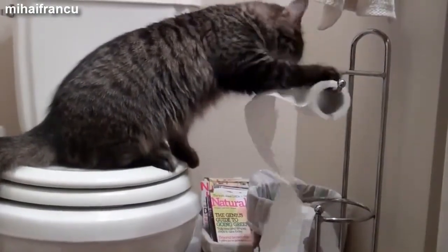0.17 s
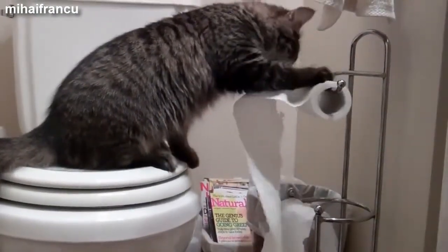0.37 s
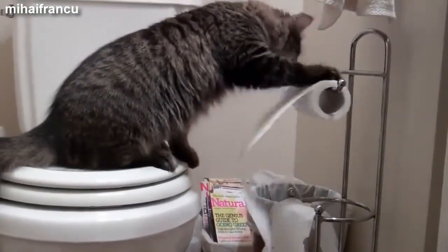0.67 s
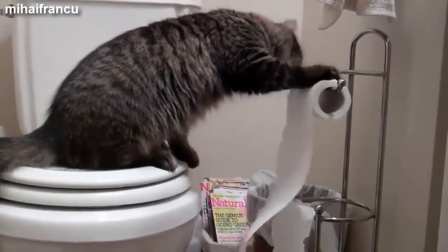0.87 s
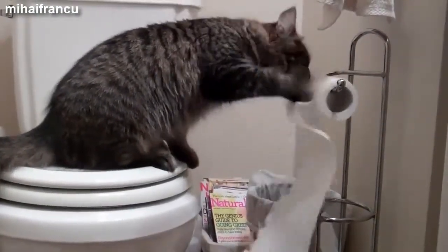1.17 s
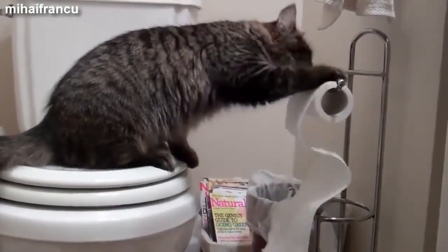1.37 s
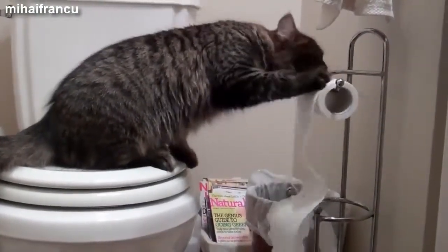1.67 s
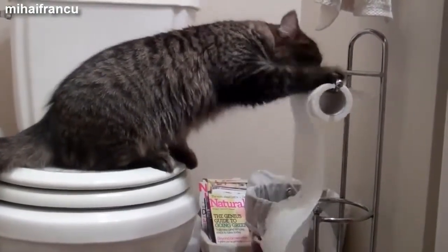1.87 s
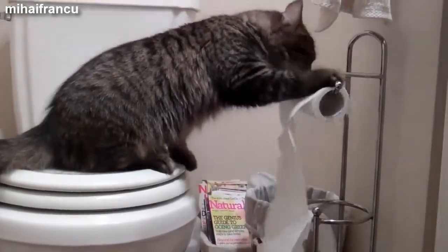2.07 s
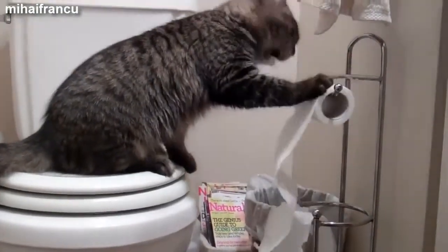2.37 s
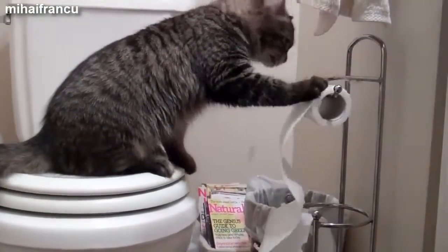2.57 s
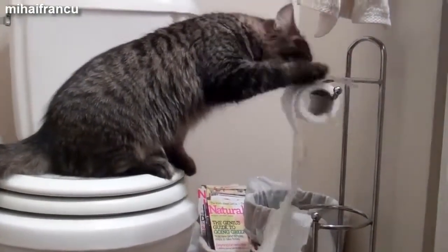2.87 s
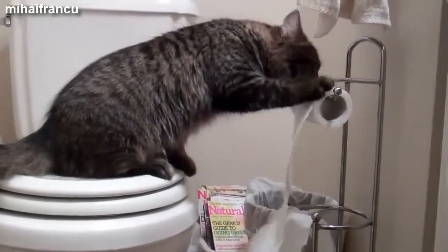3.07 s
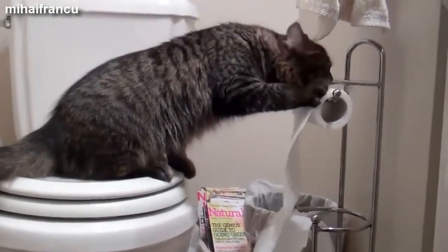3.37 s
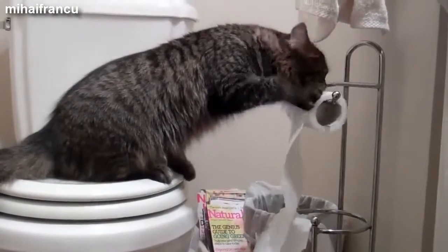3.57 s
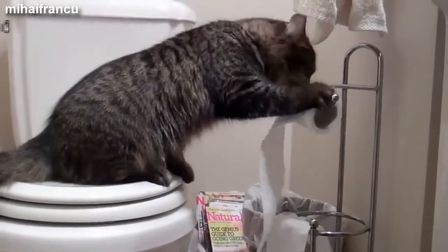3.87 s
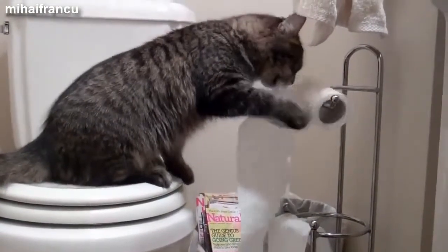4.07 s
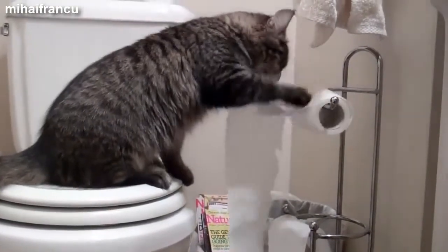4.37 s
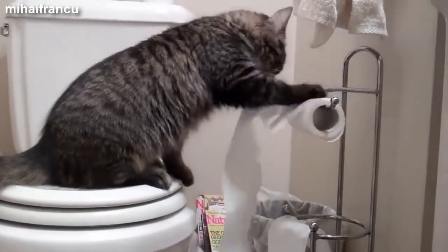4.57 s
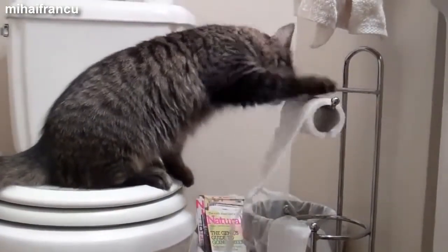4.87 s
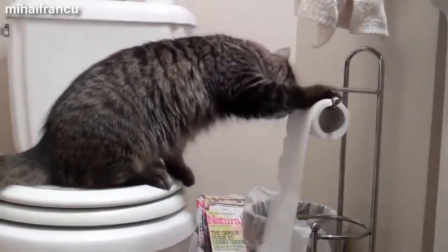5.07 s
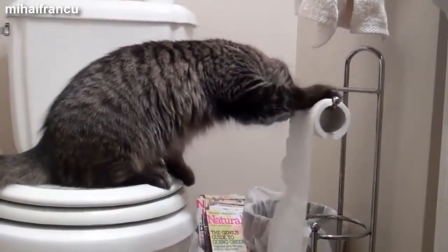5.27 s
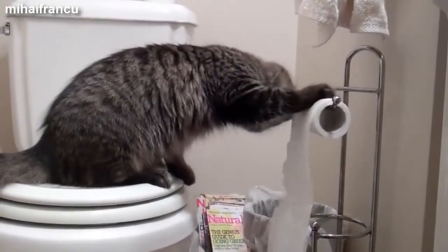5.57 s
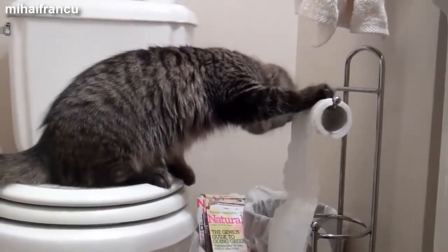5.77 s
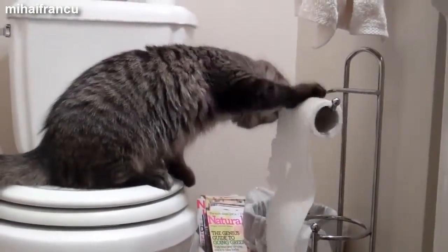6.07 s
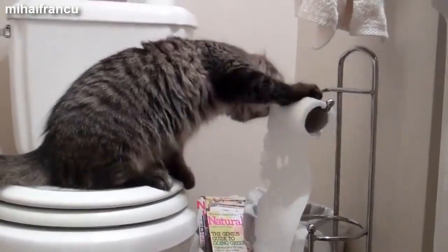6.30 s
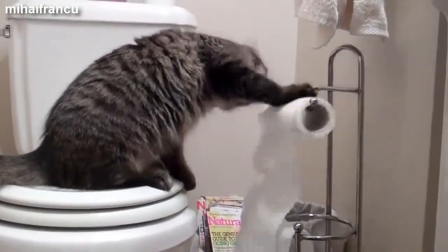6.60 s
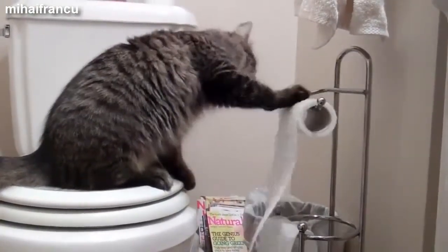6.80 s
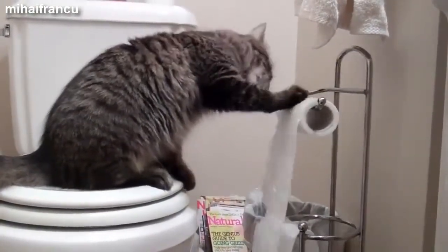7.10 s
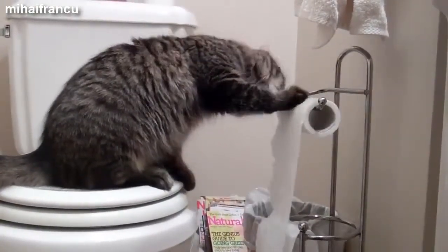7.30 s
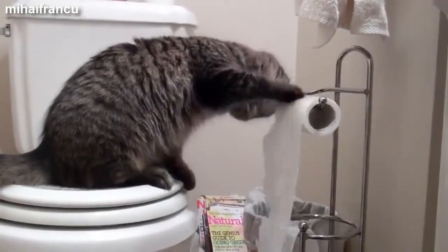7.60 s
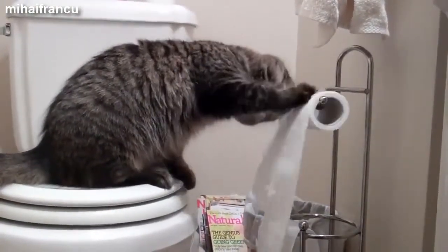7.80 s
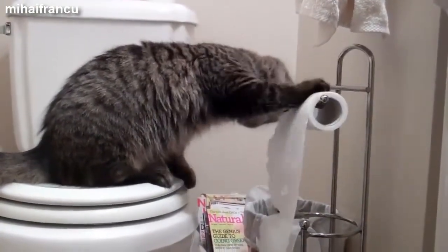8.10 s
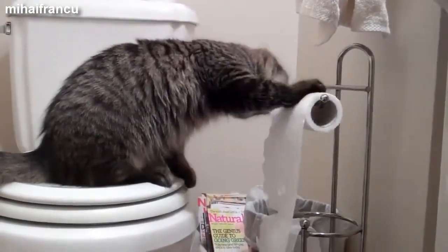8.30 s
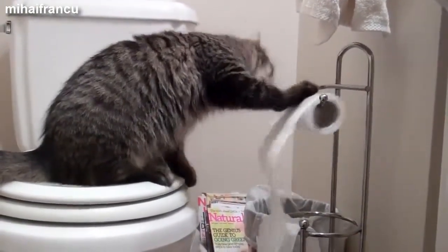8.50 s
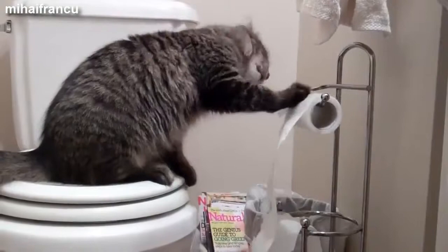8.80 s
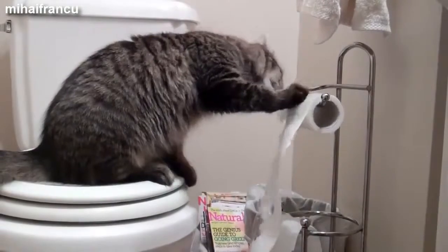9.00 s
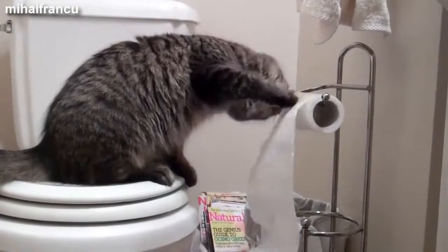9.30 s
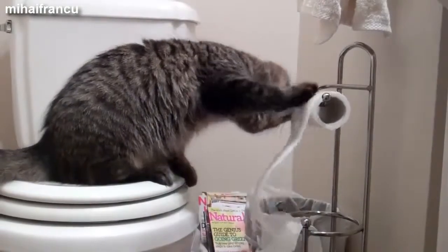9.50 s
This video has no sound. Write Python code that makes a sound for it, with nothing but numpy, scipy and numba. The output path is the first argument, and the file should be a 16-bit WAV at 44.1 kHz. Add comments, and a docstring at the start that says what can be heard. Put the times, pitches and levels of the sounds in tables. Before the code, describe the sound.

Close stereo pickup of cardboard tumbling on a steel spindle, with claw ticks and dry paper rustle over quiet room hiss. An early cluster of dull knocks gives way to sparse scratching strokes, then a brief bright clink. After a quieter stretch comes a short squeaky groan and a very sharp smack, followed by loose rattling that thins out, a softer second burst of knocks, and a quiet end. Short tiled-room echo.

```python
"""The cardboard core of a toilet roll tumbles and knocks on its steel spindle as a cat paws the roll. Each
knock is a filtered burst of push, chatter and rebounds; random grains make the rasp and rustle. Claws tick and
hard hits crackle in noise bursts, the rim cracks, the steel arm clinks, the core groans, feet thump. A small
hard-walled bathroom rings in decaying noise; two microphones with automatic gain listen."""
import sys
import numpy as np
from scipy import signal
from scipy.fft import rfft, irfft
from scipy.io import wavfile
from scipy.ndimage import uniform_filter1d
from numba import njit

SR = 44100
rng = np.random.default_rng(int(sys.argv[2]) if len(sys.argv) > 2 else 0)


def transcribe(signal):
    """Save signal, clipped to [-1, 1], as a 16-bit WAV file at the path in sys.argv[1]."""
    frames = np.atleast_2d(signal).T
    limited = np.clip(frames, -1, 1)
    pcm = np.round(limited * 32767).astype(np.int16)
    wavfile.write(sys.argv[1], SR, pcm)


N = 425565
TIME = np.arange(N) / SR
RING = TIME[:SR]  # one second

# relative spectrum of the cardboard core: (frequency [Hz], density [dB/Hz])
CORE_SPECTRUM = [(30, -8.5), (52, -12.5), (90, -7.5), (150, -5.5), (260, 3.5), (420, -3.5), (750, -2),
                 (1400, -1.5), (2300, -5), (4200, -6), (5500, -8), (11000, -6)]


def amp(db):
    """Decibels to gain."""
    return 10 ** (np.asarray(db) / 20)


def unit(x):
    """Scale to an energy of one."""
    return x / np.sqrt(np.sum(x ** 2))


def lookup(points, size=N):
    """Read a (frequency [Hz], value) table at every transform bin, on a log-frequency axis."""
    hz, value = np.transpose(points)
    bins_hz = np.fft.rfftfreq(size, 1 / SR) + 1
    return np.interp(np.log(bins_hz), np.log(hz), value)


def ring(x, response):
    """Pass a sound through an impulse response."""
    return signal.fftconvolve(np.atleast_2d(x), np.atleast_2d(response), axes=-1)[:, :N]


def colour(points, size=2048):
    """Minimum-phase impulse response of a dB spectrum, by folding its cepstrum; energy one."""
    cepstrum = irfft(lookup(points, size) * np.log(10) / 20)
    cepstrum[1:size // 2] *= 2
    cepstrum[size // 2 + 1:] = 0
    return unit(irfft(np.exp(rfft(cepstrum))))


def even(x, size=16, count=4096):
    """Level the broad humps and hollows in the spectrum of a short burst."""
    power = uniform_filter1d(abs(rfft(x, count)) ** 2, size=size)
    bins_hz = np.fft.rfftfreq(count, 1 / SR) + 1
    inverse = np.transpose([bins_hz, -10 * np.log10(power + 1e-12)])
    return signal.fftconvolve(x, colour(inverse, size=count))[:len(x)]


def butter(x, order, hz, kind="low"):
    """Butterworth filter."""
    return signal.sosfilt(signal.butter(order, hz, kind, fs=SR, output="sos"), x)


def add(track, s, sound):
    """Mix a sound in at a time in seconds."""
    start = max(int(s * SR), 0)
    track[start:start + len(sound)] += sound[:N - start]


def walk(rate_hz):
    """Random wander: straight lines between normal draws."""
    knots_s = np.arange(0, N / SR + 1, 1 / rate_hz)
    return np.interp(TIME, knots_s, rng.standard_normal(len(knots_s)))


def swell(length_s):
    """Envelope that rises to one at half its length, then dies away."""
    return 2 * RING / length_s * np.exp(1 - 2 * RING / length_s)


def grains(rate_hz, spread_db):
    """Random impulses of uneven size and either sign, rms one."""
    chance, size, sign = rng.random(N), rng.standard_normal(N), rng.standard_normal(N)
    hits = chance < rate_hz / SR
    return np.sqrt(N) * unit(hits * amp(spread_db * np.clip(size, -2, 2)) * np.sign(sign))


def modes(table):
    """Impulse response of decaying resonances with alternating polarity, energy one."""
    total = 0
    for k, (hz, db, t60_s) in enumerate(table):
        mode = np.sin(2 * np.pi * hz * RING) * np.exp(-np.log(1000) * RING / t60_s)
        total = total + (-1) ** k * amp(db) * unit(mode)
    return unit(total)


@njit
def bandpass(x, hz, damping):
    """State-variable band-pass whose centre may move every sample."""
    y, band, low = np.empty(len(x)), 0., 0.
    for i in range(len(x)):
        g = np.tan(np.pi * hz[i] / SR)
        v = (band + g * (x[i] - low)) / (1 + g * (g + damping))
        band, low, y[i] = 2 * v - band, low + 2 * g * v, damping * v
    return y


def diffuse(size):
    """Noise arriving from all sides; how alike the two microphones are depends on frequency."""
    # microphone likeness: (frequency [Hz], correlation [-1 to 1])
    likeness = [(60, 0.48), (300, 0.66), (700, 0.52), (1200, 0.59), (2200, 0.31), (4000, 0.14),
                (6500, -0.28), (11000, -0.23)]
    mid, side = rfft(rng.standard_normal((2, size)))
    alike = np.clip(lookup(likeness, size), -1, 1)
    left_right = np.array([[1], [-1]])
    pair = mid * np.sqrt(1 + alike) + left_right * side * np.sqrt(1 - alike)
    return irfft(pair / np.sqrt(2), size)


def air(level_db=-62, wander_db=-0.5):
    """Hiss and faint rumble of the quiet room: coloured diffuse noise, almost steady."""
    # relative spectrum of the quiet room: (frequency [Hz], density [dB/Hz])
    air_spectrum = [(20, -2), (35, 0), (55, -6), (108, -1.5), (155, -8), (320, -7), (450, -8), (650, -7.5),
                    (1020, -10.5), (1400, -10.5), (2400, -14.5), (5300, -16), (8900, -23.5), (11900, -35.5)]
    return ring(diffuse(N), colour(air_spectrum)) * amp(level_db + wander_db * walk(6.1))


def bathroom(onset_s=0.00029):
    """Dense echoes from close walls: diffuse noise with a decay time for each band."""
    # ring of the tiled room: (frequency [Hz], t60 [s])
    room_t60 = [(100, 0.64), (260, 0.26), (700, 0.29), (1840, 0.24), (4850, 0.18), (11000, 0.17)]
    # relative wall scattering: (frequency [Hz], level [dB])
    scatter = [(60, 3.5), (200, -0.5), (400, 1), (800, -0.5), (11000, -1)]
    noise, tail = rfft(diffuse(SR)) * amp(lookup(scatter, SR)), 0
    for k, (_, t60_s) in enumerate(room_t60):
        # overlapping bands whose shares sum to one
        share = lookup([(hz, j == k) for j, (hz, _) in enumerate(room_t60)], SR)
        tail = tail + irfft(noise * share, SR) * np.exp(-np.log(1000) * RING / t60_s)
    return np.sqrt(2) * unit(tail * (1 - np.exp(-RING / onset_s)))


def shifting(x, rooms, rate_hz=4):
    """The roll shifts on its spindle, so its sound wanders between sets of wall echoes."""
    shares = np.array([walk(rate_hz) for _ in rooms])
    shares = shares / np.sqrt(np.sum(shares ** 2, axis=0))
    return sum(ring(x * share, room) for share, room in zip(shares, rooms))


def stand_boom(core):
    """The core shakes the stand and the room around it, exciting their resonances."""
    # stand and room resonances: (frequency [Hz], relative level [dB], t60 [s])
    boom_modes = [(32.2, 4, 1), (77, -4, 0.46), (102.4, 5.5, 0.53), (199.5, 5, 0.34), (219, -2, 0.067),
                  (272.3, 4, 0.37), (316, 3.5, 0.55), (341, -5, 0.18), (414, -26, 0.37), (480.3, 7.5, 0.23),
                  (586.4, 3, 0.4), (622, -2, 0.29), (684, -2.5, 0.43), (747, -5, 0.27), (971, -3, 0.11),
                  (1180, -1.5, 0.14), (1490, -11, 0.2), (1516, -6, 0.15), (2143, -23, 0.3),
                  (3580, 3.5, 0.24)]
    return ring(core, modes(boom_modes))


def thumps(length_s=0.024):
    """The cat's weight shifts against the stand: padded feet give a dull, drawn-out push."""
    # weight shifts: (time [s], relative level [dB])
    thump_hits = [(3.762, -54.5), (4.09, -60), (6.33, -52), (6.808, -32), (7.159, -47), (8.759, -48)]
    # relative spectrum of a padded foot: (frequency [Hz], density [dB/Hz])
    foot_spectrum = [(30, -33), (70, -14), (105, 19), (160, -21), (400, -4.5), (800, -39), (3000, -70)]
    track = np.zeros(N)
    for s, db in thump_hits:
        add(track, s, amp(db) * rng.standard_normal(SR) * swell(length_s))
    return ring(track, colour(foot_spectrum))


def groans(overtone=0.13, waver=0.038, grit=0.38, grit_hz=1300):
    """The core sticks and slips on the spindle: an uneven tone swells and dies, each slip scraping."""
    # stick-slips: (time [s], pitch [Hz], relative level [dB], swell length [s], roughness [0-1])
    slips = [(6.657, 342, -49, 0.025, 0.8), (6.766, 755, -34.5, 0.054, 0.3),
             (7.787, 322, -38.5, 0.022, 0.54), (7.823, 318, -43.5, 0.018, 0.5)]
    track = np.zeros(N)
    for s, hz, db, length_s, rough in slips:
        phase = 2 * np.pi * np.cumsum(hz * (1 + waver * walk(386)[:SR])) / SR
        tone = np.sin(phase) + overtone * np.sin(2 * phase)
        tone = tone * (1 + rough * walk(294)[:SR] / 2)
        scrape = butter(rng.standard_normal(SR), 2, grit_hz)
        scrape = np.sqrt(SR) * unit(scrape * np.maximum(np.sin(phase), 0))
        add(track, s, amp(db) * swell(length_s) * (tone + grit * rough * scrape))
    return track


def clinks():
    """The steel arm, jolted in its frame, rings briefly in its modes."""
    # jolts: (time [s], relative level [dB])
    jolts = [(4.304, -47), (4.343, -30.5)]
    # steel arm modes: (frequency [Hz], relative level [dB], t60 [s])
    steel_modes = [(1080, 1, 0.045), (1130, 1, 0.036), (1210, 4, 0.046), (1300, -1.5, 0.065),
                   (1900, -4, 0.047), (2500, -3, 0.012), (4500, -16, 0.058), (6300, -22, 0.089),
                   (8900, -19, 0.22)]
    track, sound = np.zeros(N), modes(steel_modes)
    for s, db in jolts:
        add(track, s, amp(db) * sound)
    return track


def strokes(shape=0.86, rasp_hz=1900, sag=0.19, paw_rest_db=-79, sheet_rest_db=-75.5):
    """Paw strokes speed up and slow; gives rasp strength, rasp pitch [Hz] and rustle strength."""
    # strokes: (time of peak speed [s], rise [s], fall [s], relative rasp [dB], relative rustle [dB])
    stroke_table = [(.005, 0.099, 0.12, -45.5, -51), (.3, 0.11, 0.056, -55.5, -60.5),
                    (.385, 0.021, 0.043, -57, -60.5), (0.539, 0.052, 0.27, -72, -67.5),
                    (1.048, 0.059, 0.13, -72, -70), (1.28, 0.073, 0.052, -59.5, -61),
                    (1.745, 0.07, 0.089, -64, -65.5), (1.93, 0.04, 0.073, -62, -61.5),
                    (2.03, 0.023, .04, -57.5, -57), (2.085, 0.024, 0.033, -52.5, -53),
                    (2.16, 0.07, 0.19, -56.5, -54.5), (2.288, 0.026, 0.029, -47.5, -50),
                    (2.33, 0.046, 0.024, -45.5, -51), (3.66, 0.28, 0.13, -67.5, -66),
                    (3.745, 0.023, 0.015, -59, -57.5), (3.805, 0.038, 0.015, -50.5, -52.5),
                    (3.889, 0.033, 0.023, -53, -54), (3.985, 0.058, 0.015, -50, -49.5),
                    (4.045, 0.016, 0.034, -49, -46), (4.082, 0.03, 0.031, -47.5, -49.5),
                    (4.18, 0.032, 0.062, -59.5, -58.5), (4.87, 0.12, 0.13, -65, -71),
                    (6.19, 0.21, 0.26, -75, -61.5), (6.429, 0.04, 0.079, -82, -57),
                    (6.61, 0.043, 0.028, -79, -59.5), (6.71, 0.013, 0.021, -45.5, -43.5),
                    (6.83, 0.02, 0.049, -39, -45), (7.82, 0.2, 0.065, -72.5, -67.5),
                    (8.48, 0.27, 0.27, -72, -62), (9.2, 0.054, 0.035, -81, -66),
                    (9.621, 0.05, 0.04, -65, -70)]
    # resting paw and hanging sheet are never quite still
    rasp, rustle = amp(paw_rest_db) ** 2, amp(sheet_rest_db) ** 2
    weighted_hz = rasp * rasp_hz
    for s, rise_s, fall_s, rasp_db, rustle_db in stroke_table:
        # shape: 1 = pointed peak, 2 = bell
        speed = np.exp(-np.maximum((s - TIME) / rise_s, (TIME - s) / fall_s) ** shape)
        power = (amp(rasp_db) * speed) ** 2
        rasp = rasp + power
        rustle = rustle + (amp(rustle_db) * speed) ** 2
        # pitch sags only while the stroke slows
        weighted_hz = weighted_hz + power * rasp_hz * (1 - sag * (TIME > s) * (1 - speed))
    return np.sqrt(rasp), weighted_hz / rasp, np.sqrt(rustle)


def sheet(strength, flutter_db=4.5):
    """Paper fibres catch and let go in dense, bright grains."""
    # relative spectrum of the sheet: (frequency [Hz], density [dB/Hz])
    paper_spectrum = [(60, -15), (150, -9.5), (400, -6.5), (900, -9.5), (2000, 0.5), (3500, -1.5),
                      (6000, -1), (9000, -4.5), (11500, -14.5)]
    rustle = ring(grains(rate_hz=2200, spread_db=6.5), colour(paper_spectrum))
    return rustle * strength * amp(flutter_db * walk(50))


def paw(strength, hz, damping=1.67, flutter_db=3.0):
    """The pad rasps over the soft roll in coarser grains; pitch follows the stroke's speed."""
    rasp = grains(rate_hz=600, spread_db=2.5) / np.sqrt(hz)
    rasp = bandpass(bandpass(rasp, hz, damping), hz, damping)
    return np.sqrt(N) * unit(rasp) * strength * amp(flutter_db * walk(60))


def crinkles(strength, hz, rate_hz=70, above=1.06, scatter=0.089, damping=0.34):
    """Creases in the dragged sheet buckle in sparse pops through a papery ring of wandering pitch."""
    centre_hz = np.clip(hz * above * np.exp(scatter * walk(40)), 100, SR / 3)
    pops = bandpass(grains(rate_hz=rate_hz, spread_db=5.5), centre_hz, damping)
    return np.sqrt(N) * unit(pops) * strength


def snaps(width=1.187, count=4096):
    """A claw catches and paper fibres snap, or a hard hit of the core crackles: a short band-limited burst."""
    # claw snaps and the crackle of hard hits: (time [s], relative level [dB], centre [Hz], length [s])
    bursts = [(0.213, -40.5, 6550, 0.0055), (0.241, -43, 7040, 0.0043), (0.5, -42, 2370, 0.093),
              (0.663, -47.5, 2180, 0.018), (1.215, -50, 5070, 0.014), (1.55, -51, 6740, 0.03),
              (1.746, -49.5, 2210, 0.0073), (1.912, -47, 1820, 0.021), (2.943, -43.5, 1760, 0.018),
              (4.302, -38, 6950, 0.018), (4.305, -39.5, 3700, 0.024), (4.3393, -23, 7160, 0.0032),
              (4.34, -29, 2480, 0.02), (4.794, -48, 5800, 0.005), (4.908, -45.5, 5870, 0.0045),
              (6.029, -40.5, 1530, 0.0071), (6.703, -38, 6530, 0.013), (6.797, -19, 3920, 0.06),
              (6.802, -21.5, 7500, 0.04), (7.784, -47.5, 5560, 0.011), (8.589, -36.5, 6300, 0.035),
              (8.727, -44, 3970, 0.017), (8.911, -66, 3670, 0.0088), (9.182, -45, 8300, 0.0012),
              (9.392, -41.5, 4160, 0.002), (9.3925, -42, 2200, 0.0011)]
    track, t = np.zeros(N), RING[:count]
    for s, db, hz, length_s in bursts:
        noise = rng.standard_normal(count)
        crackle = noise * abs(noise) * np.exp(-2 * t / length_s)
        add(track, s, amp(db) * unit(butter(crackle, 1, [hz / width, hz * width], "band")))
    return track


def cracks(length_s=0.00052, sag=0.22, count=512):
    """The core's rim smacks the spindle: a ring of a few cycles, falling in pitch."""
    # smacks: (time [s], relative level [dB], nominal pitch [Hz])
    smack_table = [(6.7935, -9.5, 3860), (8.5755, -39, 3300), (8.722, -40, 3800), (8.9125, -51, 3700)]
    track, t = np.zeros(N), RING[:count]
    for s, db, hz in smack_table:
        falling_hz = hz * (1 + sag * (np.exp(-t / length_s) - .5))
        phase = 2 * np.pi * np.cumsum(falling_hz) / SR
        add(track, s, amp(db) * unit(np.sin(phase) * swell(length_s)[:count]))
    return track


def turning(spin_up_s=0.0099, friction_db_per_s=9.5, stop_s=0.022):
    """Rolling strength: every pushed spin picks up, loses level to friction and stops."""
    # spins: (time [s], duration [s], relative level [dB])
    spins = [(.09, .72, -51), (2, 0.17, -63), (2.32, 0.21, -59.5), (3.8, 0.41, -58), (4.08, 0.25, -57.5),
             (4.77, 0.33, -56.5), (5.18, 0.15, -56.5), (5.57, 1, -58.5), (6.71, 0.054, -45),
             (6.799, 0.11, -39), (7.121, 0.84, -69), (8.26, 0.24, -62), (8.56, .44, -54.5),
             (9.079, 0.38, -58.5)]
    strength = np.zeros(N)
    for s, length_s, db in spins:
        gate = (1 - np.exp(-TIME / spin_up_s)) * np.exp(-np.maximum(TIME - length_s, 0) / stop_s)
        add(strength, s, gate * amp(db - friction_db_per_s * TIME))
    return strength


def trundle(low_hz=270, top_hz=700, lumpy_db=1.5):
    """The uneven core bumps softly along the spindle while the roll turns."""
    bumps = ring(grains(rate_hz=220, spread_db=2.5), colour(CORE_SPECTRUM))[0]
    bumps = butter(bumps, 2, [low_hz, top_hz], "band")
    return np.sqrt(N) * unit(bumps) * turning() * amp(lumpy_db * walk(25))


def knocks(chatter=1.58, chatter_s=0.0036, rebound_s=0.028, rebound_share=.02, belly_hz=240, count=4096):
    """The core lands on the spindle: a push, a brief cardboard chatter, a fading rattle of rebounds."""
    # landings: (time [s], relative level [dB], contact hardness [Hz], bass gain [dB], rattle [0-1])
    landings = [(0.085, -39.5, 1510, 4.5, .5), (.095, -43, 900, -5, 0), (.121, -40.5, 1300, 1, .45),
                (.160, -39.5, 2400, 0, 0.44), (0.1797, -34.5, 2070, 0.5, 0.63), (.201, -42.5, 1900, 1, 0.7),
                (.243, -41.5, 1900, -6, .7), (.287, -44.5, 1600, 3.5, 0.7), (0.4017, -55, 1600, 1, 0.9),
                (.421, -49.5, 1400, -1, .8), (2.475, -55.5, 520, -10.5, 0.29), (2.515, -65, 460, -1, .8),
                (4.302, -40.5, 2400, -3, 0.4), (4.3071, -40, 2080, -7, 0.8), (4.3396, -30, 3000, -7, 0.54),
                (5.565, -44, 1000, -1, .7), (5.6967, -45, 970, -5.5, 1), (5.825, -52, 900, -6, 0.9),
                (6.3228, -54, 520, -1.5, 1), (6.703, -44, 1512, 1.5, .8), (6.746, -40, 1330, -1, 1),
                (6.7947, -10.5, 2440, -7, 0.4), (6.825, -23.5, 1210, -1, 1), (6.935, -30.5, 1720, -11, 0.9),
                (6.948, -31, 2010, -6, 0.9), (6.969, -31, 1500, 1.5, 1), (7.1156, -29.5, 2630, -6, 1),
                (7.131, -38.5, 1900, 6, 0.7), (7.157, -30.5, 2000, 0, 0.66), (7.172, -44, 1500, -4, 0.9),
                (7.296, -40, 1700, -3, 0.7), (7.304, -34.5, 2390, 0, 0.8), (7.333, -36.5, 1900, -1.5, 0.6),
                (7.347, -46, 1500, 3.5, 0.6), (7.4525, -42.5, 2056, 1.5, 1), (7.477, -41, 1900, -1, 0.75),
                (7.5854, -45, 1700, -5.5, 0.98), (7.607, -47, 1700, 2.5, 0.6),
                (7.707, -46.5, 1300, -5, 0.97), (7.908, -51.5, 800, -5.5, 1),
                (8.2565, -42.5, 1660, 1.5, 0.9), (8.533, -52, 400, 8, 0.7), (8.5531, -39, 1610, -1, 0.9),
                (8.575, -31.5, 2150, 0.5, 1), (8.594, -40, 2000, -4, .9), (8.603, -49, 2400, 3, .7),
                (8.637, -45, 1600, -2, .5), (8.7024, -41.5, 1200, 2.5, 0.5), (8.722, -36.5, 2540, 3, .5),
                (8.783, -40, 1640, 6.5, .4), (8.797, -44, 1200, -4, 0.7), (8.865, -43.5, 1100, -5, 0.4),
                (8.880, -42.5, 1780, 3.5, .3), (8.912, -40.5, 1760, 0.5, .4), (8.926, -47, 1500, -3, 0.4),
                (8.970, -44.5, 1300, -3, .7), (9.0856, -55, 650, 4, 0.7)]
    track, t, body = np.zeros(N), RING[:count], colour(CORE_SPECTRUM)
    for s, db, hard_hz, bass_db, rattle in landings:
        noise, touches = rng.standard_normal(count), rng.random(count) < rebound_share
        push = t == 0
        force = push + chatter * unit(noise * t * np.exp(-2 * t / chatter_s))
        rebounds = unit(touches * noise * np.exp(-t / rebound_s) + 1e-12)
        force = butter(even(force + rattle * rebounds), 2, hard_hz)
        knock = unit(signal.fftconvolve(force, body))
        bass = butter(knock, 1, [belly_hz / 2, belly_hz * 2], "band")
        add(track, s, amp(db) * (knock + (amp(bass_db) - 1) * bass))
    return track


def scene(count=3):
    """Sources sound directly and by the walls; the paper rustles in patches with echoes of their own."""
    rooms = [bathroom() for _ in range(count)]
    core = amp(25.5) * knocks() + amp(-8.0) * trundle()
    boom = amp(-12.0) * stand_boom(core)
    ticks = amp(20.0) * snaps()
    smacks = amp(16.0) * cracks()
    steel = amp(29.0) * clinks()
    soft = groans() + amp(0.5) * thumps()

    drag, rasp_hz, slide = strokes()
    patches = []
    for _ in rooms:
        patch = amp(3.0) * sheet(slide) + paw(drag, rasp_hz) + amp(-5.0) * crinkles(drag, rasp_hz)
        patches.append(patch / np.sqrt(count))
    rustle = amp(-5.5) * sum(patches)
    rustle = rustle + sum(ring(patch, room) for patch, room in zip(patches, rooms))

    direct = amp(-1.0) * core + amp(-4.5) * ticks + steel + soft + smacks
    scattered = amp(-0.5) * core + amp(-1.5) * ticks + amp(-8.5) * steel
    scattered = scattered + amp(-9.5) * soft + amp(-1.0) * smacks
    return direct + boom + rustle + shifting(scattered, rooms) + air()


@njit
def follow(size, fall):
    """Peak follower: jumps up at once and sinks slowly."""
    out, held = np.empty(len(size)), 0.
    for i in range(len(size)):
        held = max(size[i], held * fall)
        out[i] = held
    return out


def record(dry, limit_db=-25.0, release_s=0.47, alert_hz=7000, alert_db=13, top_hz=11300):
    """The left is louder, most in the treble; gain ducks at loud or sharp hits and creeps back; top cut."""
    # left minus right: (frequency [Hz], level difference [dB])
    balance = [(60, 4), (200, 1), (550, 1.5), (1200, 1.3), (3500, 2), (6400, 3.5), (10000, 5.5)]
    half = np.array([[.5], [-.5]])
    sound = irfft(rfft(dry) * amp(half * lookup(balance)), N)
    treble = amp(alert_db) * butter(sound, 4, alert_hz, "high")
    power = np.mean(sound ** 2 + treble ** 2, axis=0)
    loudness = np.sqrt(abs(uniform_filter1d(power, size=221)))  # 5 ms; abs guards rounding below zero
    held = follow(loudness, np.exp(-1 / (release_s * SR)))
    gain = np.minimum(1, amp(limit_db) / (held + 1e-9))
    return signal.sosfilt(signal.ellip(8, .2, 70, top_hz, fs=SR, output="sos"), sound * gain)


dry = scene()
out = record(dry)
transcribe(out)
```